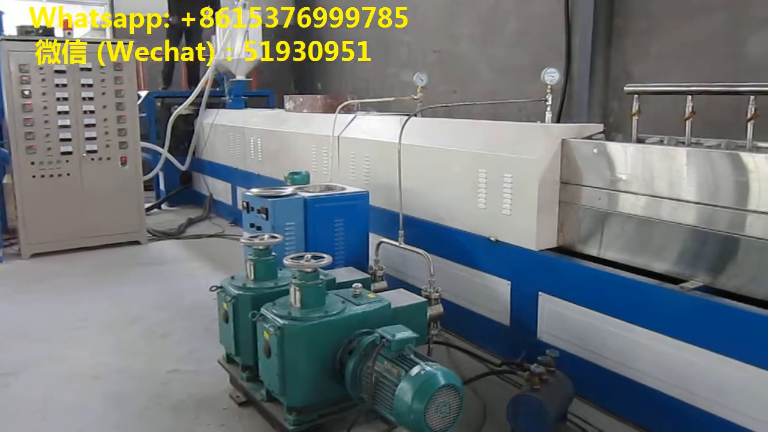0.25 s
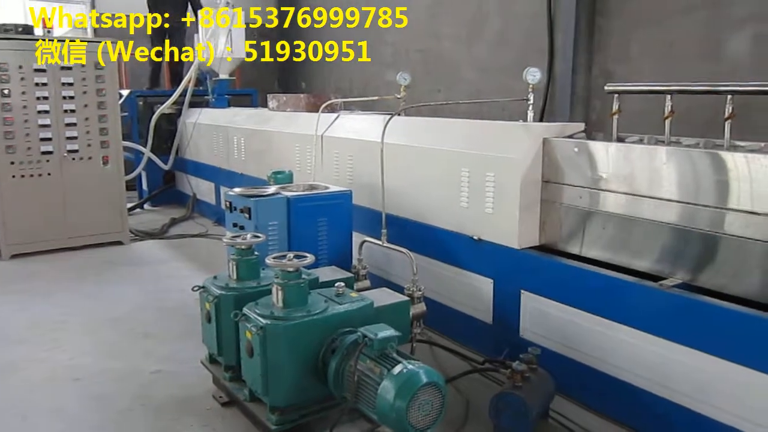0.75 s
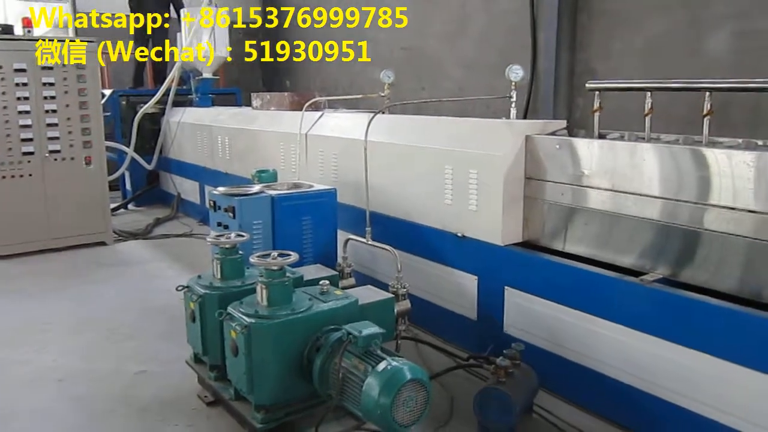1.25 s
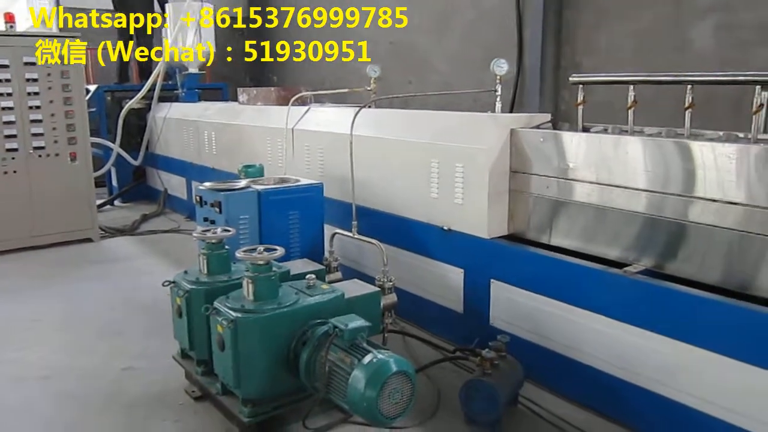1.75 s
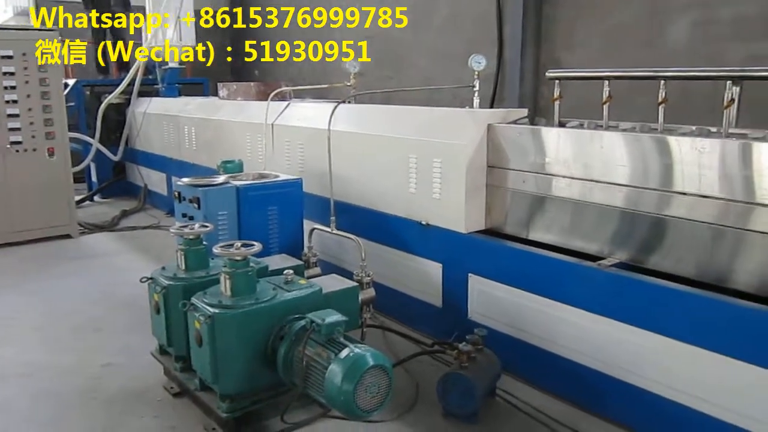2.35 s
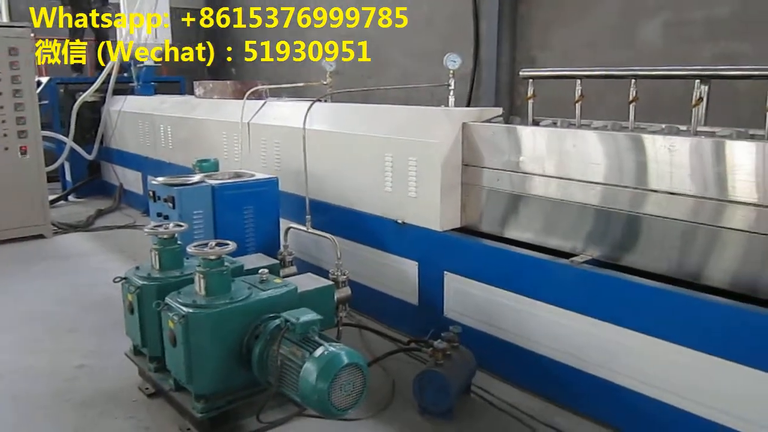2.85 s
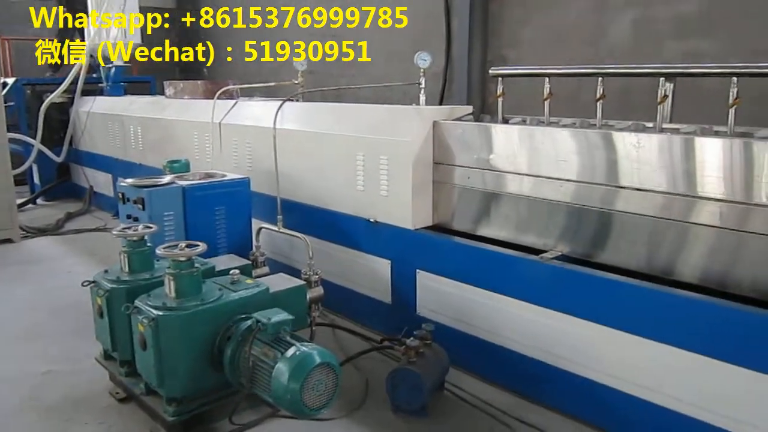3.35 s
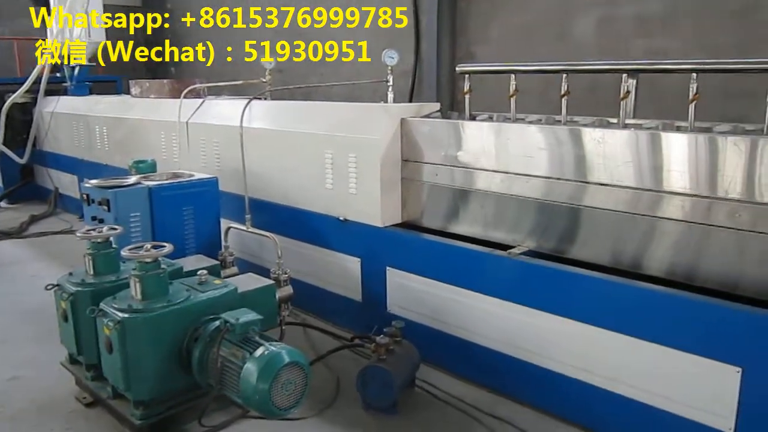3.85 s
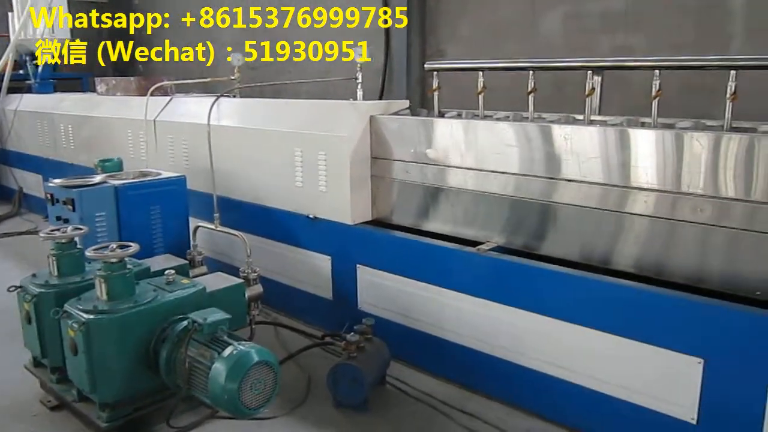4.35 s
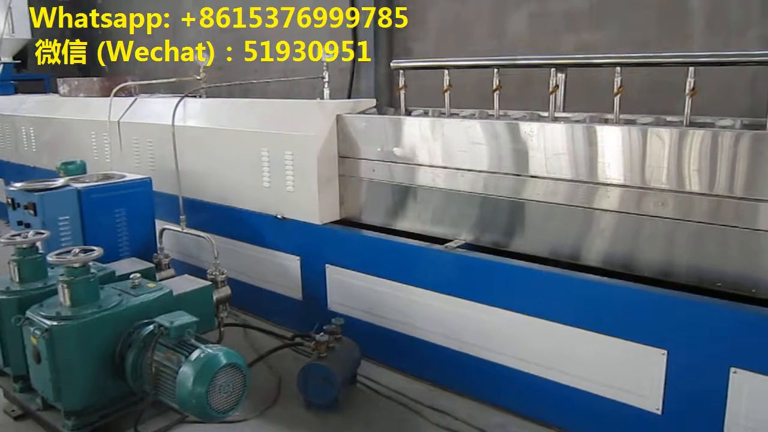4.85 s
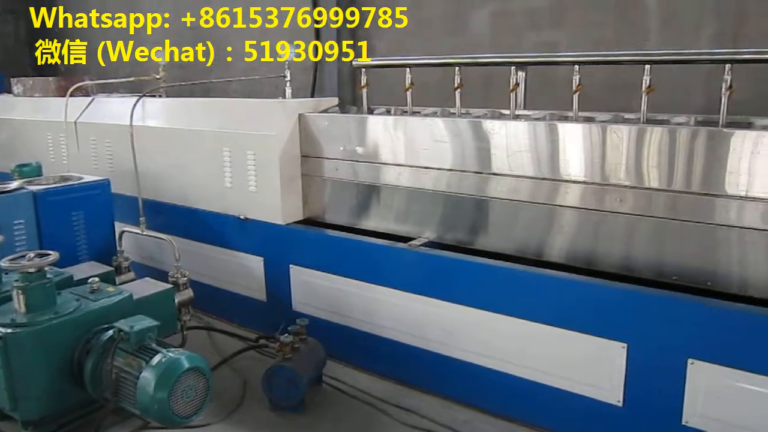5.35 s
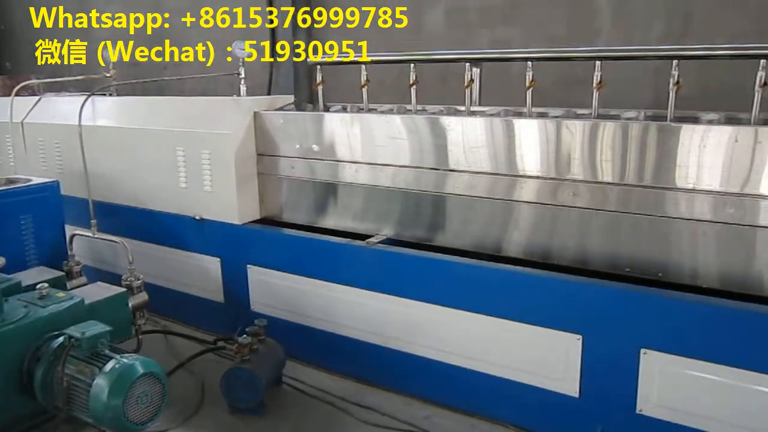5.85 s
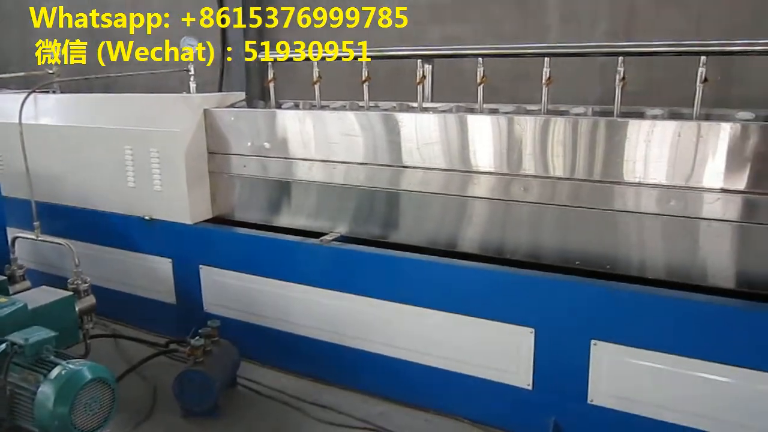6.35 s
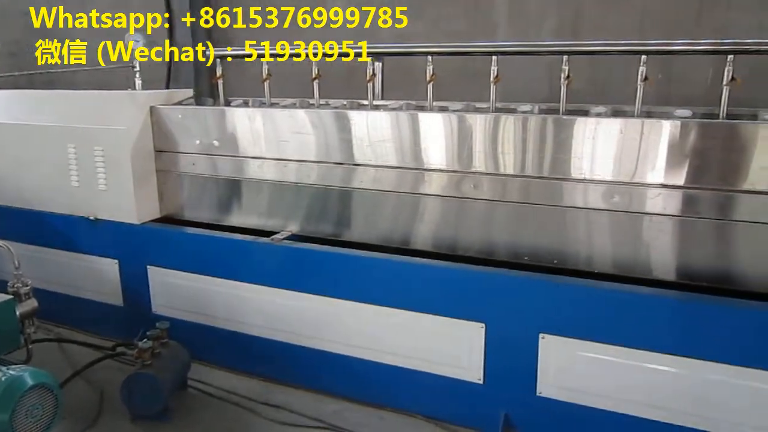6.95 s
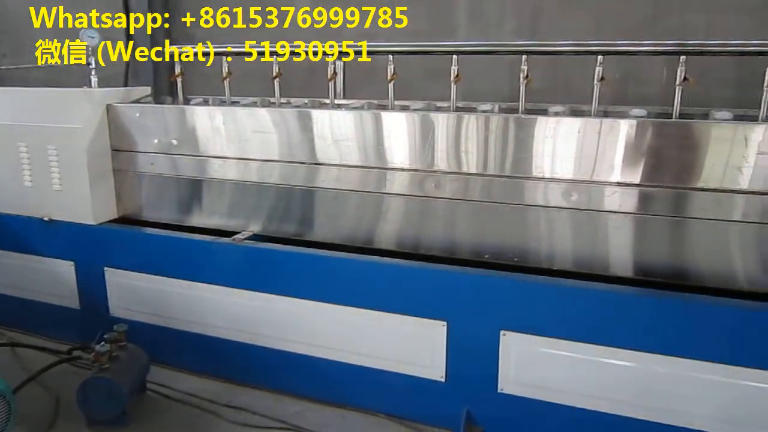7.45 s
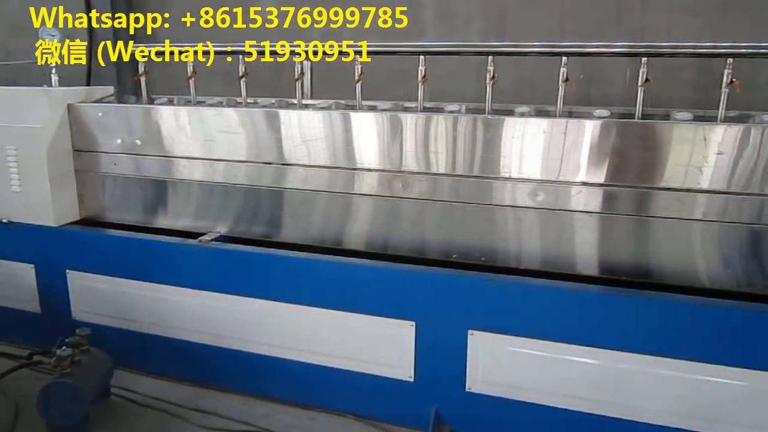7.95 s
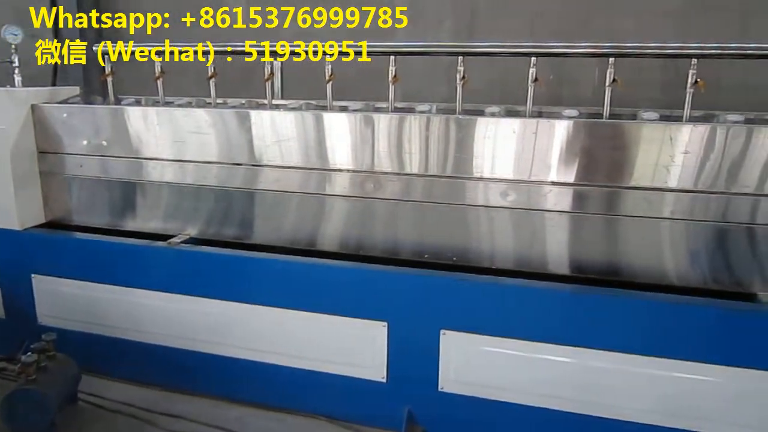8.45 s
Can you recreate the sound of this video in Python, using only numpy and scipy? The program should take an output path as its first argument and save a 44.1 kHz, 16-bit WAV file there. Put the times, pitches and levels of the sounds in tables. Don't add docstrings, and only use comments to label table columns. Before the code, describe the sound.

Constant blower roar and air hiss in a workshop, with a shrill 3 kHz drive whine, humming gears and one faint distant pipe knock.

```python
import sys
import numpy as np
from scipy import signal
from scipy.fft import rfft, irfft
from scipy.io import wavfile
from scipy.ndimage import uniform_filter1d

SR = 44100
rng = np.random.default_rng(int(sys.argv[2]) if len(sys.argv) > 2 else 0)


def gain_from_db(level_db):
    decades = np.asarray(level_db, float) / 20
    return 10 ** decades


def materialize(psi):
    bounded = np.clip(np.atleast_2d(psi).T, -1, 1)
    quanta = np.round(bounded * 32767).astype(np.int16)
    wavfile.write(sys.argv[1], SR, quanta)


N = 383669
T = np.arange(N) / SR

# t/s, share of the turn (0-1)
CAMERA_TURN = [
    (0, .05),
    (3, 0.2),
    (5, 0.53),
    (7, 0.82),
    (8.7, 0.97),
]
# f/Hz, density level/dB per Hz
BLOWER_ROAR = [(25, -98), (60, -73.5), (100, -61), (145, -57.5), (250, -51.5), (400, -52), (480, -55.5),
               (520, -57), (700, -55.5), (870, -57.5), (960, -59.5), (1350, -61), (2500, -69),
               (6000, -94.5)]
# f/Hz, density level/dB per Hz
AIR_HISS = [(500, -88), (1500, -78), (2500, -67), (3500, -67), (5000, -70), (6000, -74.5), (6600, -84),
            (6950, -88.5), (7130, -98), (7400, -105)]
# f/Hz, width/Hz, lift/dB
CASINGS = [(145, 10, 3), (200, 12, 2), (345, 40, 2), (445, 30, 2), (1730, 80, 3), (2190, 60, 1.5),
           (2330, 50, 3), (2450, 70, 2), (3010, 100, 1)]
SHAFT_STRONG = {"6th": 6, "10th": 10, "24th": 24, "32nd": 32}
# multiple of the shaft speed, level/dB
SHAFT_WEAK = [(2.0, -59), (3.0, -52), (4.0, -49), (8.0, -53), (14.0, -45), (16.0, -46), (20.0, -48),
              (48.0, -53)]
GEARS_AND_PUMPS = {"mesh a": 587.7, "mesh b": 874.5, "mesh c": 883.5, "mesh d": 2106.9, "pump a": 1649.1,
                   "pump b": 2421.1, "pump c": 3849.1, "pump d": 4150.5}
LINE_LEVELS = {"6th": (-51.5, -51, 4), "10th": (-43.5, -41, 1.6), "24th": (-42.5, -32, -0.1),
               "32nd": (-43, -41, 0.5), "mesh a": (-45, -45, 1), "mesh b": (-47, -38.5, .5),
               "mesh c": (-44.5, -49, 1.5), "mesh d": (-56, -47, 2), "pump a": (-52, -49, 2),
               "pump b": (-63, -63, 3), "pump c": (-65.5, -52, 2.5), "pump d": (-60.5, -63, 3.5),
               "lower": (-47, -47, 0.5), "carrier": (-43, -43, 0.5), "upper": (-42, -44.5, 0.2),
               "slot low": (-50, -51, 1.4), "slot high": (-54, -61, .9)}
# line, middle t/s, length/s,
# lift/dB
HALL_SPOTS = [("lower", 1.5, 2.15, 11.6), ("lower", 2.1, .8, 1.3), ("lower", 2.7, .3, -3),
              ("lower", 3.8, 1.3, 4.5), ("lower", 4.5, .5, -5), ("lower", 6.22, .5, -14.5),
              ("lower", 8.7, 3.4, 4.1), ("lower", 8.7, .9, 3.3), ("carrier", .85, 1.0, 4.5),
              ("carrier", 1.95, 0.97, 7), ("carrier", 3.2, 0.57, -7), ("carrier", 4.4, .7, -4.5),
              ("carrier", 5.03, 0.62, 2.8), ("carrier", 6.9, 2.9, 6.9), ("upper", .55, 1.1, 1.2),
              ("upper", 1.95, 1.2, -8), ("upper", 3.1, 1.1, -5), ("upper", 4.3, 1.2, -1.3),
              ("upper", 5.85, .25, -5), ("upper", 7.3, .9, -5), ("upper", 8.3, 1.2, 4),
              ("slot low", 0.05, .9, 5), ("slot low", 2.0, .9, 4), ("slot low", 3.3, 2.1, 10),
              ("slot low", 3.05, .8, 2.2), ("slot low", 8.5, 1.9, 8), ("slot high", .6, 1.9, 8),
              ("slot high", 1.8, .9, 11), ("slot high", 3.95, .8, 8), ("slot high", 6.1, 1.3, 5),
              ("6th", 2.83, .6, 10.3), ("6th", 5.0, .5, 7), ("6th", 8.25, .5, 8), ("10th", 3.7, 1.5, 3),
             ("10th", 4.57, .4, -7), ("24th", .05, 0.46, 5), ("24th", 1.9, 1.1, -1.1),
             ("24th", 3.6, 1.5, 2.2), ("24th", 5.4, 1.5, 1.9), ("32nd", .0, .25, -10.5),
             ("32nd", 4.5, .7, 2.2), ("mesh c", 6.7, .7, -4), ("mesh c", 8.3, .7, 4),
             ("32nd", 3.3, 2.0, 3.5), ("mesh a", .5, .6, -7), ("mesh a", 7.1, 0.55, -12),
             ("mesh b", 4.3, 1.6, 5.5), ("mesh b", 3.1, 1.1, 3), ("mesh c", 5.3, .5, -9),
             ("mesh c", 6.13, 0.54, 4), ("pump a", 3.0, 2.4, -11.5), ("pump b", 1.9, 1.2, 10),
             ("pump b", 5.2, 1.2, 6), ("pump c", 2.2, .9, 9), ("pump c", 4.5, 1.8, -10.5),
             ("pump d", 0.33, 1.4, 10), ("pump d", 5.0, 1.1, 9)]
# control, middle t/s, length/s, sideband shift/half turns
THROBS = [
    ("turns", 2.45, 1.3, .6),
    ("turns", 5.75, 1.4, .5),
]
# f/Hz, level/dB
FAINT_LINES = [(826.3, -49), (932.7, -54), (1083.4, -53), (1440, -55), (1520.1, -59), (1560, -59),
               (2114.3, -58), (2226.7, -55), (2373.2, -59), (2378.7, -57), (2666.3, -60), (2872, -61),
               (2974.3, -58), (3073.2, -58), (3128.4, -61), (3626.9, -59), (4000.4, -59), (4178.8, -64),
               (4400.1, -63), (4480.2, -58), (4520, -63), (4560.2, -60), (4600, -57), (5960, -70),
               (5999.9, -67), (6040, -71), (3915, -62), (4440, -61)]
# t/s, f/Hz, level/dB, t60/s
PIPE_KNOCK = (6.4, 1243, -36, .9)
# control, middle t/s, length/s, lift/dB
GAIN_MOVES = [("gain", 0.75, 0.13, -1.7), ("gain", 2.43, 0.088, 1.1), ("gain", 2.4, 0.092, -0.72),
              ("gain", 2.78, .06, -1.8), ("gain", 3.4, .06, -1.1), ("gain", 4.3, .15, -0.81),
              ("gain", 4.2, 0.14, 0.69), ("gain", 4.89, 0.13, -1), ("gain", 5.08, 0.056, -2),
              ("gain", 5.7, 0.115, 1.1), ("gain", 5.87, 0.075, -0.92), ("gain", 6.02, 0.079, -1.8),
              ("gain", 6.18, .11, 1.6), ("gain", 6.29, .06, -1.3), ("gain", 6.76, 0.14, 1.1),
              ("gain", 7.0, 0.1, -1.1), ("gain", 7.11, .06, -2.4), ("gain", 6.6, 0.057, -1),
              ("gain", 7.67, .08, -1.7), ("gain", 7.85, .25, .5), ("gain", 8.15, 0.17, -1.5),
              ("gain", 8.41, .05, -0.97), ("gain", 8.5, .07, 1.1), ("gain", 8.62, .07, 1),
              ("gain", 8.7, 0.034, -2), ("gain", 0.0, 0.031, -1.6), ("gain", 1.98, .07, -.9)]


def read(points, hz):
    f, value = np.transpose(points)
    return np.interp(np.log(hz + 1), np.log(f + 1), value)


def drift(rate):
    coarse = np.arange(0, N + 400, 200) / SR
    speeds = np.geomspace(rate / 10, rate, num=12)[:, None]
    waves = np.sin(2 * np.pi * (speeds * coarse + rng.random(speeds.shape))) / np.sqrt(speeds)
    rms = np.sqrt(np.sum(.5 / speeds))
    return np.interp(T, coarse, waves.sum(0) / rms)


def turned(pumps, blowers, t):
    return pumps + (blowers - pumps) * np.interp(t, *np.transpose(CAMERA_TURN))


def spots(rows, name):
    t = T[::200]
    total = 0 * t
    for key, middle, length, lift in rows:
        if key == name:
            total = total + lift * np.exp(-abs(2 * (t - middle) / length) ** 3)
    return np.interp(T, t, total)


def line_db(name):
    pumps_db, blowers_db, fading_db = LINE_LEVELS[name]
    fades_per_s = 1.5
    hall_db = spots(HALL_SPOTS, name)
    return turned(pumps_db, blowers_db, T) + hall_db + fading_db * drift(fades_per_s)


def tone(hz, db, waver=0.28):
    phase = 2 * np.pi * (hz * T + rng.random()) + waver * drift(3)
    return np.sqrt(2) * gain_from_db(db) * np.sin(phase)


def air():
    size, hop = 1024, 256
    frames, hz = N // hop + 5, np.fft.rfftfreq(size, 1 / SR)
    real, imag, patches = rng.standard_normal((frames, len(hz), 3)).T
    patches = uniform_filter1d(uniform_filter1d(patches, size=14, axis=0), size=14, axis=1)
    flutter = uniform_filter1d(rng.standard_normal(frames), size=7)
    t = np.arange(frames) * hop / SR
    roar_db = read(BLOWER_ROAR, hz)[:, None] + turned(1.5, 4, t)
    hiss_db = read(AIR_HISS, hz)[:, None] + turned(2, 0.9, t) + .6 * flutter / flutter.std()
    power = gain_from_db(roar_db) ** 2 + gain_from_db(hiss_db) ** 2
    z = (real + 1j * imag) * np.sqrt(power) * gain_from_db(.5 * patches / patches.std())
    flow = gain_from_db(14.5) * signal.istft(z, nperseg=size, noverlap=size - hop)[1][:N]
    fine = np.fft.rfftfreq(N, 1 / SR)
    lift_db = sum(db / (1 + (2 * (fine - f) / width) ** 2) for f, width, db in CASINGS)
    low_cut = 1 / (1 + (26 / (fine + 1)) ** 4)
    return irfft(rfft(flow) * gain_from_db(lift_db) * low_cut, N)


def shaft():
    shaft_hz = 24.203
    strong = sum(tone(k * shaft_hz, line_db(name)) for name, k in SHAFT_STRONG.items())
    weak = sum(tone(round(k) * shaft_hz, db - 1.5 + 2 * drift(4), waver=.4) for k, db in SHAFT_WEAK)
    return strong + weak


def gears():
    return sum(tone(hz, line_db(name)) for name, hz in GEARS_AND_PUMPS.items())


def drive():
    carrier_hz, supply_hz, slot_hz = 3000.1, 40.0, 666.8
    carrier, supply = 2 * np.pi * carrier_hz * T, 2 * np.pi * supply_hz * T
    shift = np.pi * (-.46 + spots(THROBS, "turns"))
    lower = gain_from_db(line_db("lower")) * np.cos(carrier - supply + shift)
    middle = gain_from_db(line_db("carrier")) * np.cos(carrier)
    upper = gain_from_db(line_db("upper")) * np.cos(carrier + supply + shift)
    slot_low = tone(carrier_hz - slot_hz, line_db("slot low"), waver=.15)
    slot_high = tone(carrier_hz + slot_hz, line_db("slot high"), waver=.15)
    whine = np.sqrt(2) * (lower + middle + upper) + slot_low + slot_high
    flutter_db, flutters_per_s = .5, 24
    return whine * gain_from_db(flutter_db * drift(flutters_per_s))


def thin_lines():
    return sum(tone(hz, db - 2 + 3 * drift(.8), waver=.3) for hz, db in FAINT_LINES)


def clang():
    start, hz, db, t60 = PIPE_KNOCK
    age = np.maximum(T - start, 0)
    onset = 1 - np.exp(-age / .012)
    return gain_from_db(db - 60 * age / t60) * onset * np.sin(2 * np.pi * hz * age)


def scene():
    tones = shaft() + gears() + drive() + thin_lines() + clang()
    return (air() + gain_from_db(.8) * tones)[None]


def ragged_edge(x):
    hz, t, z = signal.stft(x, SR, nperseg=1024, noverlap=768)
    jitter = rng.standard_normal(len(t) // 6 + 1).repeat(6)[:len(t)]
    kept = hz[:, None] < 7005 + 95 * jitter
    return signal.istft(z * kept, SR, nperseg=1024, noverlap=768)[1][:, :N]


def top_cut(x):
    return signal.sosfilt(signal.butter(12, 7200, fs=SR, output="sos"), x)


def record(dry):
    breath_db, breaths_per_s = 0.25, 16
    x = dry * gain_from_db(spots(GAIN_MOVES, "gain") + breath_db * drift(breaths_per_s))
    ceiling = .42
    mix = ragged_edge(ceiling * np.tanh(x / ceiling))
    return top_cut(mix)


dry = scene()
out = record(dry)
materialize(out)
```